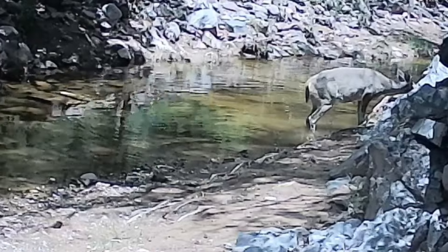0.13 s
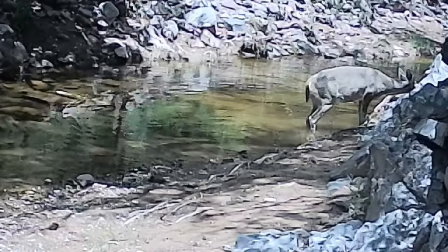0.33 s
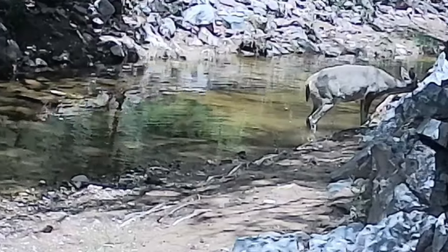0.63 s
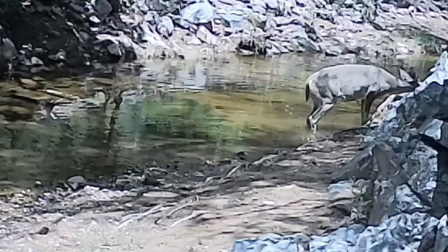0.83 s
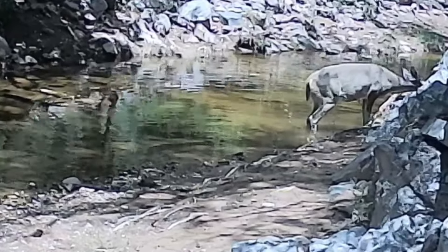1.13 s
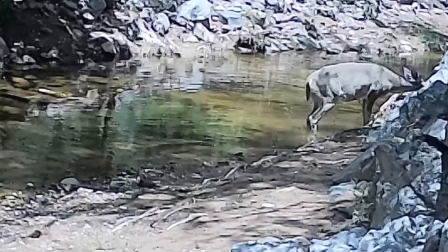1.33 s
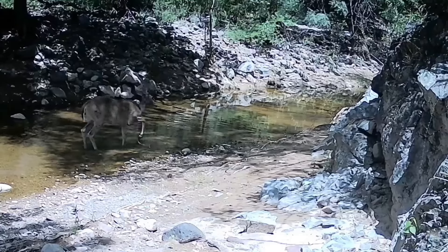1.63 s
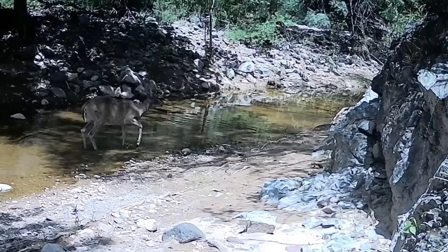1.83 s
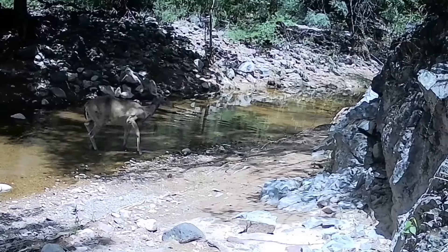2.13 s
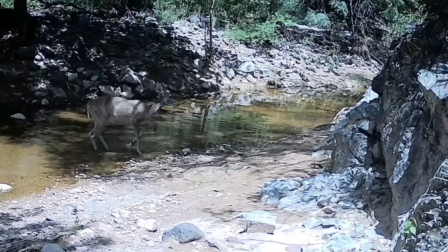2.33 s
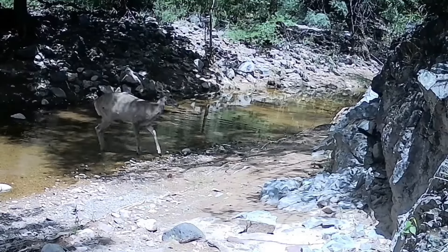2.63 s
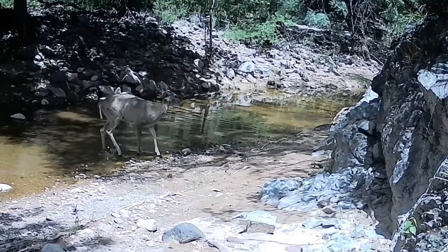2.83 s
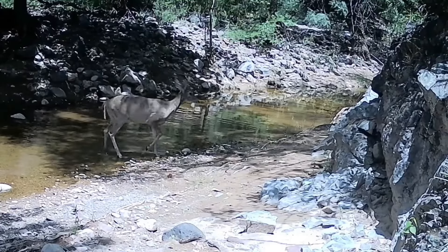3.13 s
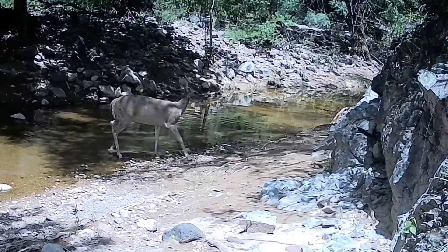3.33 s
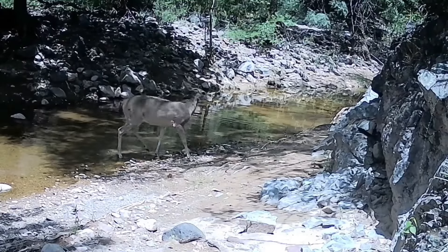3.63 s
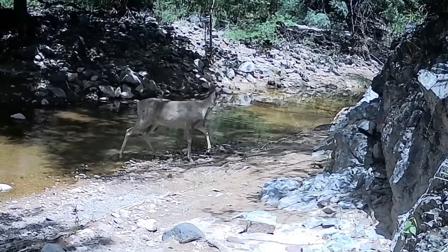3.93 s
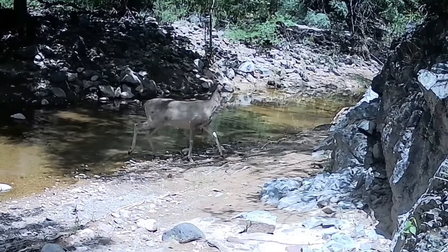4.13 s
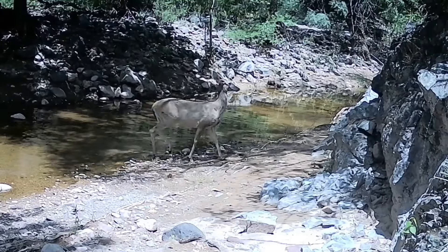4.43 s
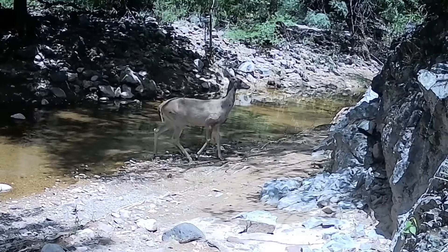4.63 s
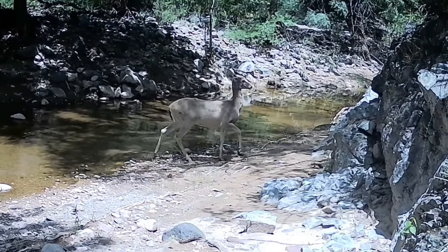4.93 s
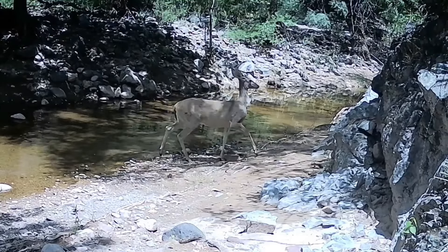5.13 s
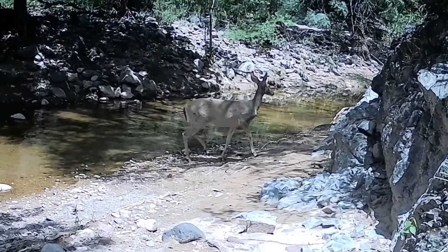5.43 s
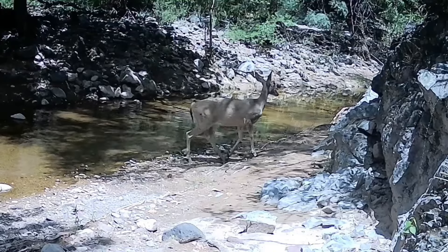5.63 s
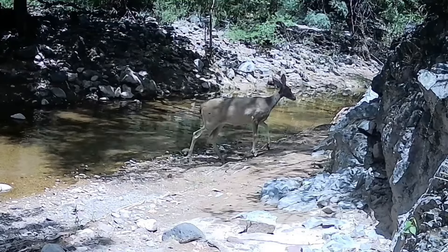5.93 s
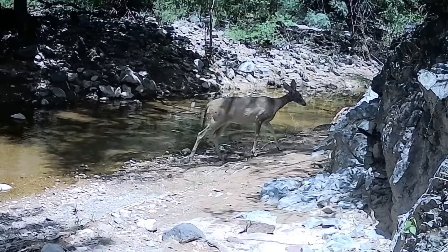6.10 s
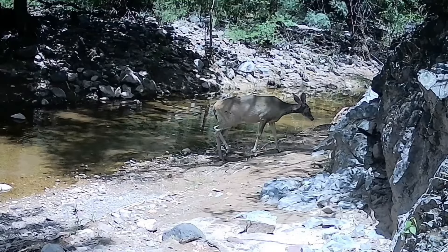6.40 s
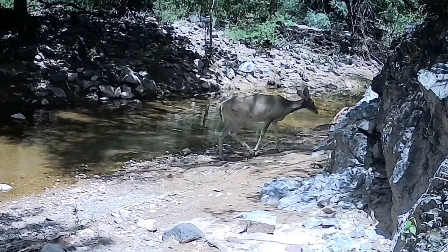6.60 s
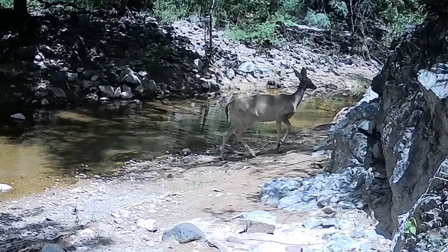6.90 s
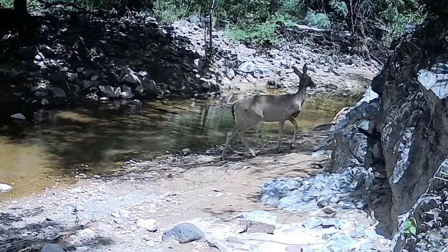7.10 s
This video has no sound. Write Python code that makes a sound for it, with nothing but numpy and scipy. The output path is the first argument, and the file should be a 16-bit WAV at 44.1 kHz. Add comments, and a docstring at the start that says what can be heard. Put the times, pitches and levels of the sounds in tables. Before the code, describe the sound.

Outdoors at a shallow, stony creek, a low air rumble and faint wash of water open quietly, with one tiny falling bird chip. About a second and a half in, a bright cicada buzz cuts in abruptly and holds steady. Close by, a deer's slow steps scuff and crunch gravel, with sharp pebble clicks. One microphone in the open, with a dull, limited treble.

```python
"""A quiet creek bed in summer: low air rumble, a faint wash of water and one thin, falling bird chip.
Then a cicada's buzz is suddenly there and holds steady, while feet shift on gravel close by with
soft scuffs, crunches and clicking pebbles. Water, air and grit are coloured noise, the chip is a
gliding tone, the buzz is a fast train of clicks made to ring, and pebbles are short ringing bursts.
Rocky banks and trees scatter the buzz, the chip and the pebble clicks."""
import sys
import numpy as np
from scipy import signal
from scipy.fft import rfft, irfft, next_fast_len
from scipy.io import wavfile
from scipy.ndimage import map_coordinates

SR = 44100
rng = np.random.default_rng(int(sys.argv[2]) if len(sys.argv) > 2 else 0)


def log_audio(samples):
    """Write samples as a 16-bit WAV file to the path given in sys.argv[1]."""
    # one column per channel
    frames = np.atleast_2d(samples).T
    # limit to full scale, then quantise
    limited = np.clip(frames, -1, 1)
    pcm = np.round(limited * 32767).astype(np.int16)
    wavfile.write(sys.argv[1], SR, pcm)


N = 320166  # length in samples, about 7.26 s

# tone colour of hard stones: f/Hz, relative level/dB
STONE_COLOUR = [(150, -24.5), (600, -2), (1100, 3), (2000, 0.5), (4000, -3), (6000, -3.5), (9000, -16)]
# dull tone colour of damp earth: f/Hz, relative level/dB
EARTH_COLOUR = [(60, -13), (220, -2), (380, -2.5), (550, 0.5), (900, -2.5), (1600, -10.5), (3000, -12),
                (6000, -30.5)]


def amp(db):
    """Turn decibels into a gain."""
    return 10 ** (np.asarray(db) / 20)


def unit(x):
    """Scale a sound to an average (rms) level of 1."""
    return x / np.sqrt(np.mean(x ** 2) + 1e-20)


def curve(rows):
    """Draw straight lines between (time in s, value) rows, one value per sample."""
    return np.interp(np.arange(N) / SR, *np.transpose(rows))


def wobble(rate):
    """Make a smooth random curve with `rate` random points a second."""
    points = rng.standard_normal(int(N * rate / SR) + 4)
    return map_coordinates(points, [np.arange(N) * rate / SR])


def filtered(x, response):
    """Multiply each frequency in x by response(frequency in Hz)."""
    size = next_fast_len(len(x) + 8192)
    spectrum = rfft(x, size) * response(np.fft.rfftfreq(size, 1 / SR))
    return irfft(spectrum, size)[:len(x)]


def coloured(x, points):
    """Give x a tone colour from (Hz, dB) points, then scale it to rms 1."""
    f, db = np.transpose(points)
    return unit(filtered(x, lambda hz: amp(np.interp(np.log(hz + 1), np.log(f), db))))


def ringing(x, centre_hz, width_hz):
    """Let x excite one resonance, then scale it to rms 1."""
    def resonance(f):
        damping = 1j * f * width_hz
        return damping / (centre_hz ** 2 - f * f + damping)

    return unit(filtered(x, resonance))


def add(track, s, sound):
    """Mix a sound into the track from s seconds on."""
    part = track[max(round(s * SR), 0):][:len(sound)]
    part += sound[:len(part)]


def banks(x, t60):
    """Scatter x from rocks and trees: dense random echoes that fade by 60 dB in t60 seconds."""
    t = np.arange(SR // 2) / SR
    tail = rng.standard_normal(len(t)) * amp(-60 * t / t60)
    return signal.fftconvolve(x, tail / np.linalg.norm(tail))[:N]


def creek():
    """Slow water makes an even wash of noise; moving air rumbles on the microphone."""
    # wash: f/Hz, relative level/dB per Hz
    water = [(40, -4.5), (150, 0), (280, -2.5), (500, -8), (1000, -11), (2000, -17.5), (4000, -19.5),
             (5500, -21), (7200, -20), (8000, -28), (8800, -42.5)]
    # rumble: f/Hz, relative level/dB per Hz
    rumble_colour = [(8, 3.5), (25, 3), (50, -3.5), (85, -9.5), (130, -17.5), (200, -27.5), (500, -47),
                     (1500, -71.5)]
    # moving air, gusty at first and then calmer: t/s, rumble level/dB before the lift below
    air = [(0, -56), (.6, -55), (.87, -58), (1.02, -51.5), (1.4, -54.5), (1.8, -58), (3.2, -60.5),
           (3.8, -56.5), (4.3, -60), (7.26, -59.5)]
    lift_db, gust_db = 4.5, 1.3  # overall lift; depth of the quick random gusts

    wash = amp(-64.0 + 0.26 * wobble(3.8)) * coloured(rng.standard_normal(N), water)
    rumble_level = amp(curve(air) + lift_db + gust_db * wobble(10))
    rumble = rumble_level * coloured(rng.standard_normal(N), rumble_colour)
    return wash + rumble


def bird():
    """One quick tone glides downward, mostly heard as its echo among the trees."""
    # pitch of the chip: t/s, f/Hz
    pitch = [(0.795, 6240), (0.7985, 8030), (0.802, 6750), (0.807, 5560), (0.812, 4750), (0.816, 4300)]
    leaves_hz = 7400  # upper edge of the echo

    t = np.arange(N) / SR
    start, end = pitch[0][0], pitch[-1][0]
    progress = np.clip((t - start) / (end - start), 0, 1)
    swell = np.abs(np.sin(np.pi * progress)) ** .5 * amp(-18 * progress)
    chip = amp(-46) * swell * np.sin(2 * np.pi * np.cumsum(curve(pitch)) / SR)
    # leaves swallow the highest part of the echo
    echo = filtered(banks(chip, t60=0.34), lambda hz: 1 / np.sqrt(1 + (hz / leaves_hz) ** 20))
    return chip + amp(5) * echo


def ticks(per_second, pitch_hz, pitch_spread, cycles, spread_db):
    """Single small stones: each rings for a few cycles at its own pitch and strength."""
    chance = rng.random((int(per_second * N / SR), 4))
    start = (chance[:, :1] * N).astype(int)
    hz = pitch_hz * np.exp(pitch_spread * (chance[:, 1:2] + chance[:, 2:3] - 1))
    # mostly weak stones, a few strong ones
    strength = amp(spread_db * np.minimum(-np.log(1 - chance[:, 3:]), 3))
    lag = np.arange(SR // 128)
    turns = hz * lag / SR
    rings = strength * np.sin(2 * np.pi * turns) * np.exp(-turns / cycles)
    return unit(np.bincount((start + lag).ravel(), rings.ravel(), N)[:N])


def settling():
    """Grit keeps shifting under the weight of a foot: a fine rustle with separate ticks in it."""
    # tone colour of the rustle: f/Hz, relative level/dB per Hz
    gravel = [(150, -22.5), (500, -3), (1000, -4), (2200, 0.5), (3600, -0.5), (4600, -4.5), (6000, -1.5),
              (7500, -9.5), (9000, -22)]
    # how much loose grit shifts underfoot: t/s, level/dB
    grit_level = [(0, -93), (1.4, -75.5), (2.7, -76.5), (3.5, -62.5), (3.8, -64), (4.75, -56.5),
                  (5.25, -65), (5.55, -70), (6.15, -73), (6.33, -61), (7.05, -60.5), (7.26, -64.5)]
    # fine sand in the grit: t/s, gain of the treble/dB
    sand = [(3.1, -3), (3.5, 4.5), (5.4, -1.5), (6.5, -3)]
    coarse_hz = 4020  # upper edge of the coarse stones' sound

    rustle = coloured(rng.standard_normal(N), gravel)
    stones = ticks(per_second=420, pitch_hz=2900, pitch_spread=.9, cycles=1.1, spread_db=6)
    shifting = amp(-2) * rustle + amp(-3) * stones
    # coarse stones sound dull; fine dry sand adds the treble
    dull = filtered(shifting, lambda hz: 1 / np.sqrt(1 + (hz / coarse_hz) ** 20))
    treble = amp(curve(sand)) * (shifting - dull)
    return amp(curve(grit_level) + 1.4 * wobble(30)) * (dull + treble)


def grit(size, per_second, spread_db):
    """Random tiny impacts of very unequal strength."""
    hit = rng.random(size) < per_second / SR
    strength = amp(spread_db * np.minimum(rng.standard_normal(size), 2))
    return unit(hit * rng.standard_normal(size) * strength)


def footsteps():
    """Each scuff grinds gravel of its own coarseness over damp earth."""
    # foot scuffs: t/s, rise/s, fade/s, crunch level/dB, crunch centre f/Hz
    scuffs = [ (1.41, 0.035, 0.031, -70, 1000), (1.623, 0.011, 0.043, -56.5, 1440),
              (2.040, 0.029, 0.03, -46.5, 1420), (2.29, .08, 0.085, -60, 1600),
              (2.794, 0.012, 0.057, -63, 2100), (2.967, 0.026, .25, -68, 1680),
              (3.358, 0.045, 0.053, -45.5, 6000), (3.713, .008, 0.012, -45, 1590),
              (3.839, .003, .14, -46, 3960), (3.97, 0.013, 0.029, -50, 2100),
              (4.262, .002, 0.0077, -38, 1450), (4.267, .003, 0.089, -44.5, 3600),
              (4.657, 0.12, 0.094, -49, 3020), (5.099, 0.0026, 0.088, -49.5, 3670),
              (5.239, .015, 0.022, -52.5, 3260), (5.404, 0.009, 0.045, -58, 3200),
              (5.85, 0.051, 0.065, -57.5, 3200), (6.205, 0.079, .06, -51.5, 3130),
              (6.5, 0.043, .025, -59.5, 2900), (6.862, 0.0025, 0.021, -46.5, 2880),
              (6.909, 0.013, .035, -52.5, 3000), (7.138, 0.0073, 0.03, -55, 2320)]
    fade_shape = 1.85  # the foot's pressure lingers, then falls ever faster
    # earth compared with crunch at that centre: the duller the scuff, the more earth
    earth_at_centre_db, earth_centre_hz, earth_db_per_octave = 2, 1517, -11.5

    t = np.arange(SR // 2) / SR
    track = np.zeros(N)
    for s, rise, fade, crunch_db, centre_hz in scuffs:
        release = np.exp(-(np.maximum(t - rise, 0) / fade) ** fade_shape)
        pressure = np.clip(t / rise, 0, 1) * release
        grains = grit(len(t), per_second=3500, spread_db=3.5) * amp(1.8 * wobble(110)[:len(t)])
        crunch = ringing(coloured(grains, STONE_COLOUR), centre_hz, width_hz=1.19 * centre_hz)
        crunch = ringing(crunch, centre_hz, width_hz=3.7 * centre_hz)
        earth = coloured(rng.standard_normal(len(t)), EARTH_COLOUR)
        earth_db = earth_at_centre_db + earth_db_per_octave * np.log2(centre_hz / earth_centre_hz)
        add(track, s, amp(crunch_db) * pressure * (crunch + amp(earth_db) * earth))
    return track


def pebbles():
    """Stones knock together: a crack with a short ring, a dull knock in the ground and a bright ping."""
    # contacts: t/s, crack level/dB, ring f/Hz, ring width/Hz, bright ping relative to crack/dB
    contacts = [ (2.042, -44.5, 1600, 1300, -21), (2.303, -51, 1100, 300, -18),
                (2.816, -49, 2200, 400, -19), (3.019, -53, 1140, 350, -18), (3.09, -49, 2240, 400, -20),
                (3.361, -42.5, 2000, 3000, -18), (3.460, -29, 1680, 500, -29),
                (3.461, -31.5, 2560, 547, -31), (3.546, -41.5, 2380, 2500, -21),
                (3.598, -36.5, 4400, 2800, -22), (3.604, -37.5, 5250, 1800, 0),
                (3.723, -37, 2000, 1300, -22), (3.982, -29.5, 2840, 3410, -10),
                (4.082, -28.5, 2500, 2200, -4), (4.264, -27, 2420, 3000, -2),
                (4.2717, -29, 2030, 2990, 5.5), (4.314, -41, 2200, 900, 0.5),
                (4.423, -41, 2110, 1710, -19.5), (4.857, -44.5, 2980, 2800, -20),
                (6.344, -40, 3170, 1300, -13), (6.373, -36.5, 2870, 1390, -2),
                (6.659, -44, 1910, 1500, -11), (6.862, -44, 2400, 2420, 18), (6.903, -43, 1490, 900, -16),
                (6.926, -48, 2600, 2000, 14), (6.943, -47, 2300, 2000, 11), (6.978, -28, 1146, 550, 6.5),
                (6.979, -24.5, 2730, 2200, -6), (7.049, -44, 3400, 3000, 10.5)]
    # tone colour of the bright ping: f/Hz, relative level/dB
    ping_colour = [(4800, -42), (5800, -10.5), (6500, 1), (7200, 2), (7900, -3.5), (8800, -30.5)]
    knock_db = -18  # the ground's knock, relative to the crack

    track, t = np.zeros(N), np.arange(SR // 16) / SR

    def struck(sound, t60):
        """A blow of fixed energy that dies away by 60 dB in t60 seconds."""
        fade = amp(-60 * t / t60) * (1 - np.exp(-t / 0.00027))
        return unit(sound * fade) * np.sqrt(np.mean(fade ** 2))

    for s, db, ring_hz, width_hz, ping_db in contacts:
        crack, knock, ping = rng.standard_normal((3, len(t)))
        ring = ringing(coloured(crack, STONE_COLOUR), ring_hz, width_hz)
        ring = ringing(ring, ring_hz, width_hz=2.2 * width_hz)
        body = struck(ring, t60=0.016)
        ground = amp(knock_db) * struck(coloured(knock, EARTH_COLOUR), t60=0.023)
        bright = amp(ping_db) * struck(coloured(ping, ping_colour), t60=0.019)
        add(track, s, amp(db) * (body + ground + bright))
    return track + amp(-13) * banks(track, t60=.12)


def buckles(cycles, jitter_s, scatter_db):
    """One sharp click per cycle, uneven in time and size."""
    at = np.interp(np.arange(1, int(cycles[-1])), cycles, np.arange(N))
    chance = rng.standard_normal((len(at), 2))
    at = at + jitter_s * SR * chance[:, 0]
    # a short sinc pulse lets each click fall between two samples
    taps = at.astype(int)[:, None] + np.arange(-8, 9)
    clicks = np.sinc(taps - at[:, None]) * amp(scatter_db * chance[:, 1:])
    return np.bincount(np.clip(taps, 0, N - 1).ravel(), clicks.ravel(), N)


def cicada():
    """The tymbal snaps in, then more weakly out; the hollow abdomen rings, and the banks smear the buzz."""
    # tymbal speed before a slight random drift: t/s, in-and-out cycles per second/Hz
    tymbal = [(1.5, 157.8), (2.8, 158.1), (4.0, 159), (4.5, 158.8), (5.6, 159.6), (7.26, 160)]
    # resonance of the hollow abdomen: f/Hz, relative level/dB
    abdomen = [(4500, -67), (5500, -32.5), (5950, -19), (6280, -14), (6400, -8), (6700, -6), (7050, -1.5),
               (7190, -5), (7320, 1.5), (7450, -5.5), (7850, -1), (8200, -7.5), (8400, -11), (8900, -32)]
    # loudness of the buzz: t/s, level/dB
    buzz_level = [(1.5, -45.5), (2.6, -44.5), (4.3, -44), (5.6, -44.5), (7.26, -44.1)]
    buzz_start, waver_db = 1.484, 0.32  # start in s; the level wavers a little

    cycles = np.cumsum(curve(tymbal) + .2 * wobble(6)) / SR
    inward = buckles(cycles, jitter_s=.00012, scatter_db=1.8)
    outward = amp(-10) * buckles(cycles - .36, jitter_s=.0003, scatter_db=2.5)
    snaps = inward + outward
    # the straight path keeps more treble than the scatter from rocks and leaves
    direct = coloured(snaps, abdomen)
    direct = coloured(direct, [(6000, -5.5), (7000, -0.5), (7500, 5.5), (8500, -0.5)])
    # plain noise joins the scattered snaps and blurs them
    scattered = unit(banks(snaps, t60=0.3)) + amp(3.0) * rng.standard_normal(N)
    scattered = coloured(scattered, abdomen)
    scattered = coloured(scattered, [(6000, 2), (7100, 1.3), (7500, -1.2), (8500, -1.7)])
    buzz = unit(direct * amp(1 + 1.1 * wobble(22)) + scattered)
    present = np.clip((np.arange(N) / SR - buzz_start) / .002, 0, 1)
    return present * amp(curve(buzz_level) + waver_db * wobble(13)) * buzz


def scene():
    """Everything reaches one microphone."""
    background = creek() + bird()
    ground = footsteps() + settling() + pebbles()
    return (background + ground + cicada())[None]


def record(dry):
    """The camera keeps only the sound below a low band limit and adds a constant electrical offset."""
    top_hz, offset = 8980, -.0545  # offset as a share of full scale
    return filtered(dry[0], lambda hz: hz < top_hz)[None] + offset


dry = scene()
out = record(dry)
log_audio(out)
```